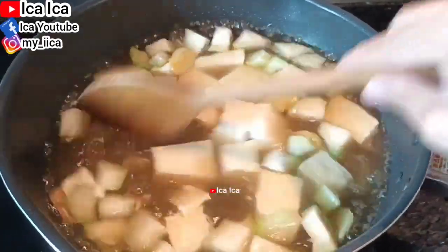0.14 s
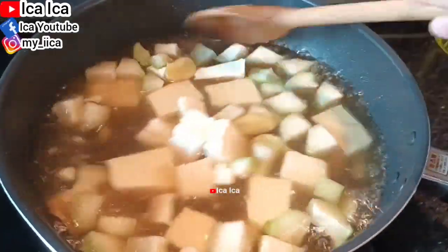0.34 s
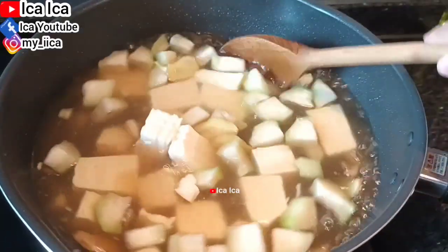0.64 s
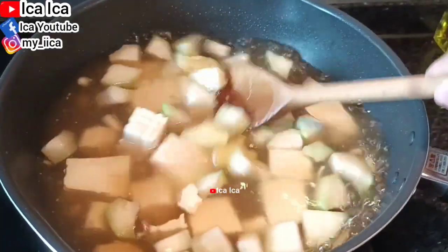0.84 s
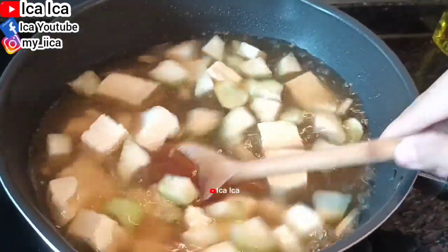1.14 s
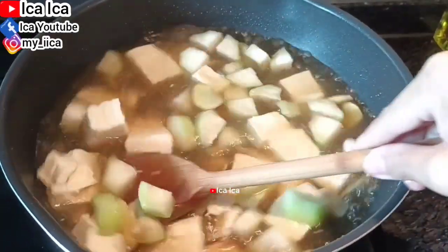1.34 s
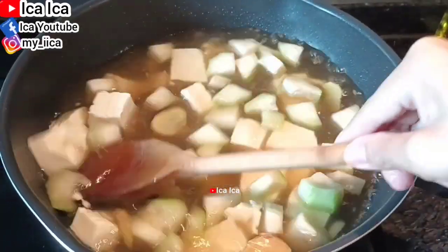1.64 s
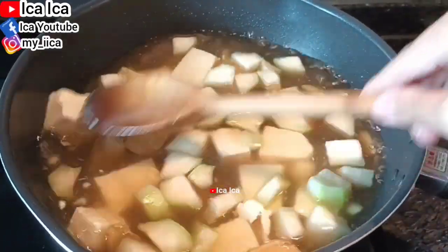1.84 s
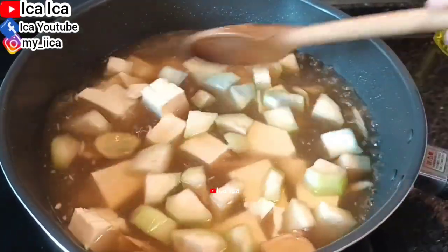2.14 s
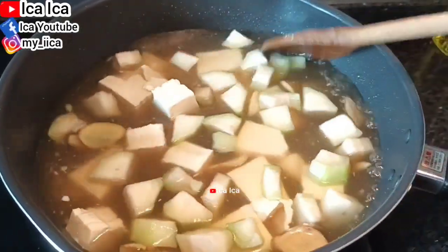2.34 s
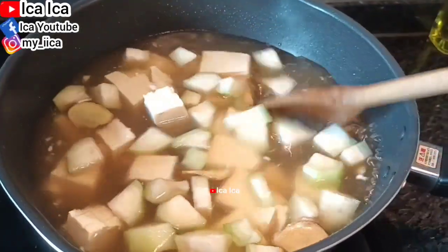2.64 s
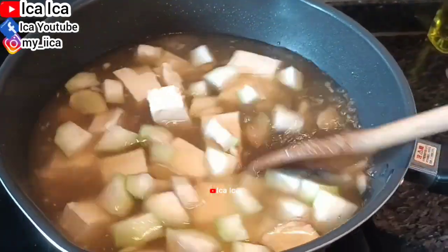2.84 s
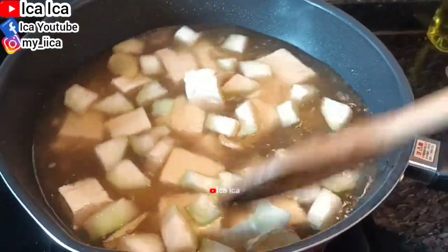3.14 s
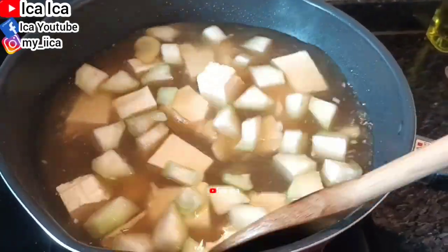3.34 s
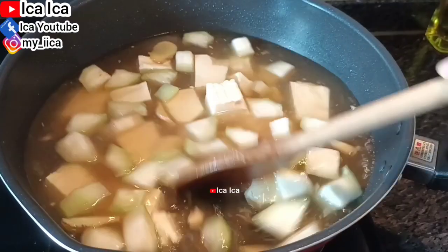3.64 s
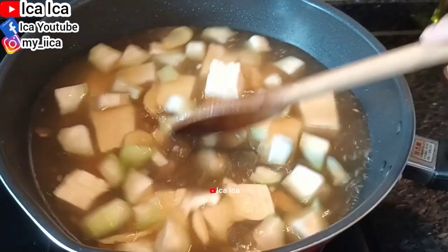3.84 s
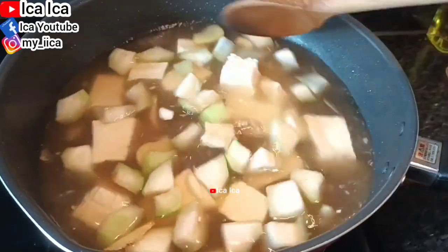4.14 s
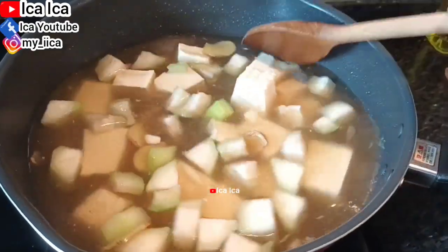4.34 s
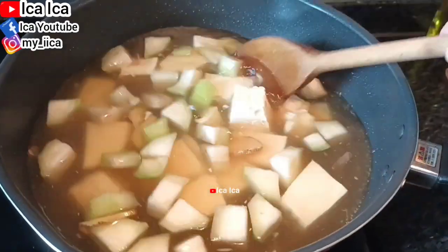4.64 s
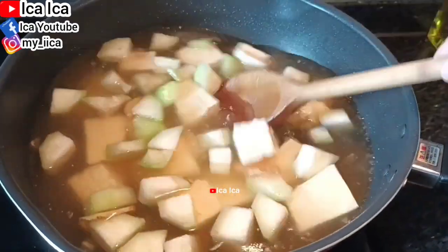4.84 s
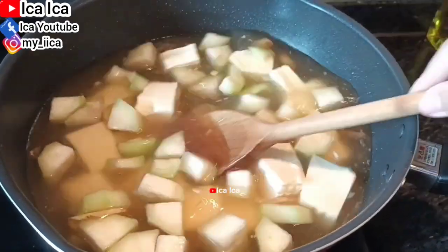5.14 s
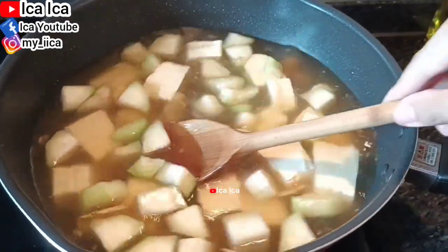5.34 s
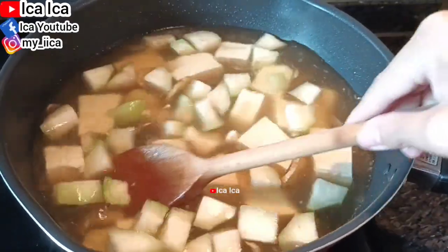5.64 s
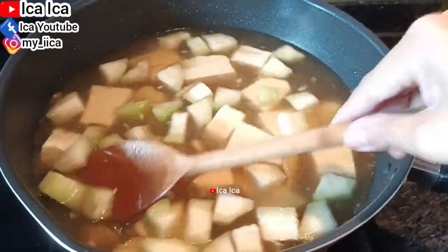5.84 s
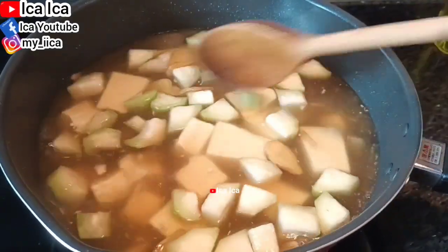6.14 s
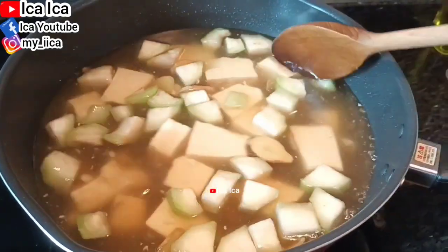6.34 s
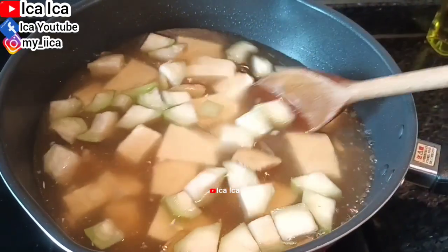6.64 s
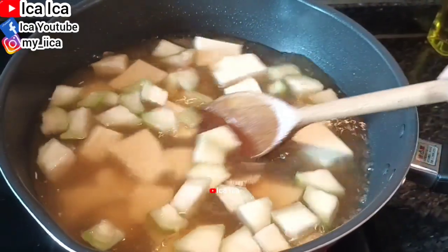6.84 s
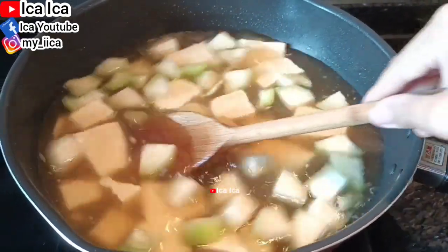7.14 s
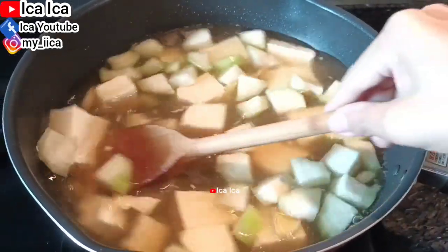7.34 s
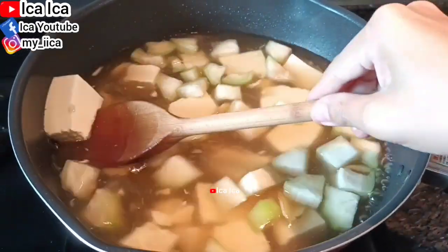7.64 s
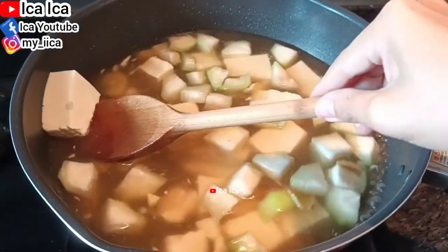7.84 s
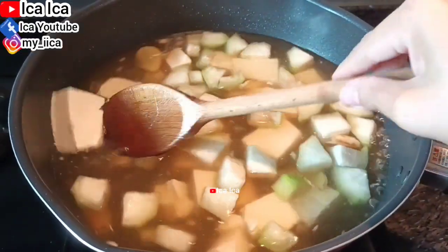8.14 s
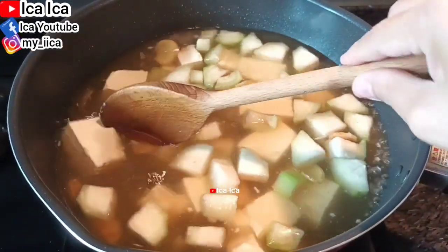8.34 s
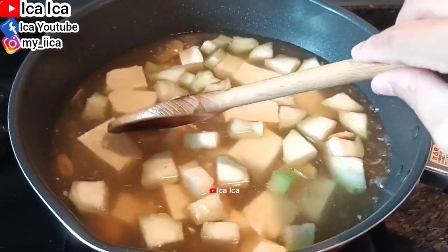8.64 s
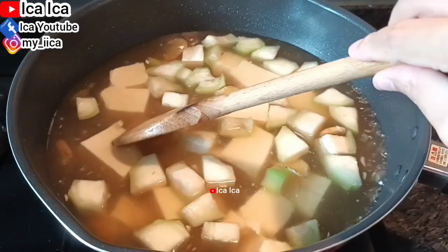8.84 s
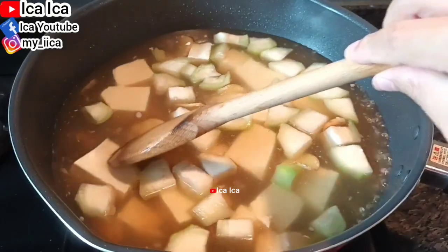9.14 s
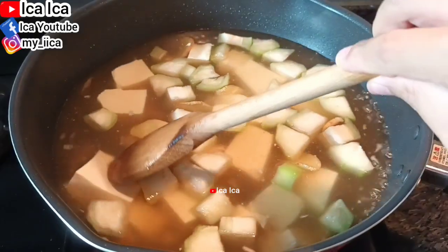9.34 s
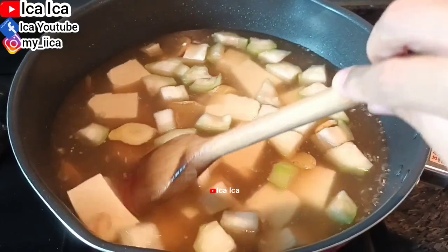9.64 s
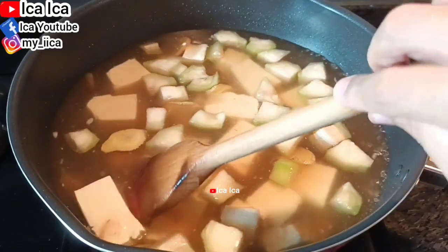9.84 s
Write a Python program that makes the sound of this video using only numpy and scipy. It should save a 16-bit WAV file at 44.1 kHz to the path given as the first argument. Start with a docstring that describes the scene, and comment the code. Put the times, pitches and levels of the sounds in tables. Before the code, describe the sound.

In a small kitchen, close to the pan, a bright dense sizzle opens and thins over about four seconds into scattered sharp spits and pops. A wooden spoon stirs, giving irregular dull knocks and clicks against the metal, with faint liquid swishes. A brief flare of hiss and snapping comes at the middle, then it calms. A low, unsteady hum and soft fan rush continue throughout.

```python
"""A dense sizzle comes first and thins to single spits: soup simmers in a metal pan on a humming stove.
Bubbles bursting on the hot wall are short damped rings over a hiss; the largest add a crack and a low pop.
A wooden spoon strikes the damped modes of the pan and frees clusters of ringing bubbles in the broth.
Two close tones beat in the hum, fan noise carries narrow resonances, and a small kitchen answers the pan.
The listener is a phone with a left and a right microphone port, close by."""
import sys
import numpy as np
from scipy import signal
from scipy.fft import rfft, irfft
from scipy.io import wavfile

SR = 44100
rng = np.random.default_rng(int(sys.argv[2]) if len(sys.argv) > 2 else 0)


def dump_mix(stems):
    """Bounce the given channels to the path in sys.argv[1] as a 16-bit WAV at rate SR."""
    frames = np.atleast_2d(stems).T  # one column per channel
    limited = np.clip(frames, -1, 1)  # hard clip at full scale
    pcm = np.round(limited * 32767).astype(np.int16)
    wavfile.write(sys.argv[1], SR, pcm)


N = 441000  # samples
TIME, BINS = np.arange(N) / SR, np.fft.rfftfreq(N, 1 / SR)  # s, Hz

# Strength of the boil, which flares when broth is washed up the hot wall.
# Each row: time in seconds, hiss in dB before a common offset.
BOIL_CURVE = [(0.0, -57.5), (3.59, -73), (4.29, -71), (4.65, -72), (5.01, -63.5), (5.24, -70.5),
              (5.65, -67), (5.99, -73), (6.63, -68), (7.38, -73), (8.91, -73), (9.08, -76.5), (10.0, -71)]
# Colour of the sizzle. Each row: frequency in Hz, relative level in dB.
SIZZLE_COLOUR = [(800, -22), (1500, -12.5), (4000, -11), (6200, -8.5), (8200, -15), (9600, -7.5),
                 (10500, -0.5), (11700, -5), (12500, -16), (13700, -18), (15000, -5.5), (16000, -12)]
# The largest bubbles. Each row: start in seconds, level in dB before a common trim, pitch in Hz,
# pop level in dB before a common boost.
LARGE_SPITS = [(0.1237, -31.5, 10600, -40), (0.843, -34, 10600, -30), (1.89, -29.5, 11200, -18.5),
               (1.91, -36, 10400, -20), (2.2812, -33, 10400, -26), (2.6845, -24, 10600, -18),
               (2.9353, -32.5, 10600, -24), (2.9452, -27, 15300, -23), (3.309, -36, 10100, -15.5),
               (3.6892, -38.5, 11300, -39), (3.9858, -41, 14700, -20), (4.0537, -38, 10800, -39),
               (4.4638, -38, 11400, -13), (4.4868, -34, 15400, -16), (4.6653, -29.5, 11200, -8.5),
               (4.9452, -24, 10700, -21), (5.0784, -43, 11400, -36), (5.1178, -44, 14900, -35),
               (5.1687, -21, 10800, -12), (5.214, -35.5, 11400, -13), (5.458, -35, 11800, -7),
               (6.668, -33, 11200, -40), (6.8266, -39, 10500, -15.5), (6.8912, -43, 15500, -34),
               (7.2474, -38, 15200, -19), (7.9572, -35.5, 10100, -23)]
SPIT_PAN_DB = -25.5  # left against right: the pan is on the right
SMALL_SPITS_PER_S, SMALL_SPIT_DB, SMALL_SPIT_SPREAD_DB, SMALL_SPIT_DEPTH_DB = 7, -42, 2, -32
# Pitches that the small spits favour. Each entry: pitch in Hz.
SMALL_SPIT_PITCHES = (10600, 11350, 14800, 15400)
# Spoon on pan. Each row: start in seconds, force in dB before a common offset, boost of the thud in dB,
# thud pitch in Hz, hard click in dB, contact edge in Hz, ring time as a factor, left-right in dB.
SPOON_KNOCKS = [(0.418, -21.5, 10, 920, -14.5, 1630, 0.72, -9),
                (2.2361, -9, 1, 796, -4.5, 3350, 1.53, -17.5), (2.374, -36, 11.5, 850, -5, 1430, 1.1, -13),
                (3.180, -12, 11, 430, 2, 3620, 1.8, -11), (3.197, -14.5, 21, 363, -1, 2540, 0.75, -5),
                (3.271, -24.5, -12, 503, -2, 4000, 1, -7), (3.3518, 3.5, -3, 760, -27, 2320, 0.45, -7),
                (4.406, -16.5, -2, 1260, -27, 1680, 1.24, -16),
                (6.401, -17.5, 16.5, 544, -5, 1980, 0.78, -12.5)]
# Modes of pan and spoon. Each row: frequency in Hz, relative level in dB,
# time to fall 60 dB in seconds before the ring-time factor.
PAN_MODES = [(263.5, -30.5, 0.092), (383, -23.5, 0.086), (430, -27, 0.043), (547, -18.5, 0.046),
             (612, -19, 0.1), (765, -17.5, 0.045), (875, -18.5, 0.057), (1099, -7.5, 0.039),
             (1270, -4.5, 0.021), (1525, -9.5, 0.043), (1650, -5.5, 0.014), (1888, -5, 0.038),
             (2301, -7.5, 0.052), (2443, -10, 0.053), (2750, -4, 0.013), (3202, -5.5, 0.017),
             (3950, -4.5, .02), (4390, -4, 0.013), (4800, -7, 0.011), (6060, -2, 0.011), (7100, -11, 0.013),
             (10500, -26, 0.0047)]
# Broth stirred or washed up the hot wall. Each row: start in seconds, length in seconds, level in dB,
# central bubble pitch in Hz, spread of pitch in octaves.
BROTH_SLOSHES = [(0.873, 0.046, -55, 5460, 0.87), (1.041, 0.033, -61, 2220, 0.16),
                 (1.393, 0.12, -62.5, 399, 1.46), (1.885, 0.042, -50, 4370, 1.05),
                 (4.172, 0.15, -57, 4370, 1.42), (4.62, 0.022, -49.5, 3840, 1.4),
                 (5.853, 0.034, -60, 4500, .25), (6.72, 0.05, -65.5, 283, 0.63),
                 (7.078, .17, -62, 380, 1.12), (8.88, 0.051, -58.5, 5650, 1.26),
                 (9.654, 0.04, -56.5, 590, 0.059), (9.87, 0.1, -72, 1360, 0.26)]
# Loudness of the hum. Each row: time in seconds, level in dB.
HUM_LEVEL = [(0.0, -55), (0.86, -52.5), (1.06, -58), (1.16, -51.5), (1.54, -50.5), (1.6, -58.5),
             (2.54, -60.5), (2.6, -53.5), (2.96, -72), (3.04, -50.0), (3.24, -54.5), (3.48, -70),
             (3.68, -60), (3.74, -49), (4.82, -66.5), (4.86, -52.5), (5.18, -52), (5.26, -78), (5.56, -43),
             (5.84, -51.5), (5.88, -62), (6.24, -50), (6.82, -67), (7.0, -47.5), (7.42, -68), (7.72, -51),
             (7.98, -62), (8.08, -45), (8.2, -46), (8.32, -65.5), (8.68, -67), (8.86, -41.5), (9.02, -58),
             (9.98, -58)]
HUM_HZ, BEAT_HZ = 89.7, 8.78  # the lower tone, and its distance from the upper one
UPPER_TONE_DB, DRONE_DB = 2, -65  # the upper tone against the lower; the steady drone under both
# Colour of stove fan and room air. Each row: frequency in Hz, relative level in dB.
AIR_COLOUR = [(20, -16), (60, -0.5), (130, 1), (170, 2), (240, -5.5), (450, -4.5), (750, -7.5), (1000, -16),
              (2000, -13), (4000, -15.5), (6300, -19), (8000, -26), (16000, -23)]
AIR_DB = -62
# Likeness of the two ports in diffuse sound. Each row: frequency in Hz, left-right likeness from 0 to 1.
PORT_LIKENESS = [(30, 0.86), (100, 0.93), (300, 0.84), (700, 0.45), (1500, 0.086), (5000, 0.17)]
# Resonances in the fan noise. Each row: frequency in Hz, nominal width in Hz, level in dB, left-right in dB.
FAN_RESONANCES = [(1543, 65, -73, -8), (1641, 105, -67.5, -2), (2407, 110, -74, -8.5),
                  (3142, 90, -75, -10.5), (4220, 85, -75.5, 2), (5210, 140, -81.5, -1),
                  (5970, 79, -83.5, -18), (6330, 52, -81, -1)]
# Decay of the kitchen. Each row: frequency in Hz, time to fall 60 dB in seconds.
KITCHEN_DECAY = [(200, 0.15), (700, 0.25), (2000, 0.23), (5000, 0.2), (9000, 0.089), (16000, 0.035)]
EDGE_HZ = 16200  # upper edge of the sound: nothing is heard above it


def gain_of(db):
    """Level and amplitude: 20 dB is a factor of ten."""
    return 10 ** (np.asarray(db) / 20)


def evened(x):
    """Normalization to an rms of 1."""
    return x / np.sqrt(np.mean(x ** 2) + 1e-20)


def read(points, hz):
    """Interpolation of a curve on a logarithmic frequency scale."""
    point_hz, value = np.transpose(points)
    return np.interp(np.log(hz + 1), np.log(point_hz + 1), value)


def follow(rows):
    """Linear interpolation in time: the columns of a curve, one value a sample."""
    s, *columns = np.transpose(rows)
    return [np.interp(TIME, s, column) for column in columns]


def add(mix, s, sound):
    """Superposition: a sound is summed into the mix from time s."""
    part = mix[:, max(round(s * SR), 0):][:, :sound.shape[1]]
    part += sound[:, :part.shape[1]]


def noise(gain):
    """Spectral shaping: noise of rms 1 with the given spectrum."""
    return evened(irfft(rfft(rng.standard_normal(N)) * gain, N))


def drift(hz):
    """Low-passed noise: slow chance up to the given rate."""
    return noise(1 / (1 + (BINS / hz) ** 4))


def sides(pan_db):
    """Level difference between the ports: left and right gains whose mean is 1."""
    pair = np.array([[gain_of(pan_db)], [1.]])
    return pair / pair.mean()


def place(x, pan_db):
    """Level and time difference: the sound reaches the left port four samples later."""
    late = np.pad(x, (4, 0))[:len(x)]
    return sides(pan_db) * np.array([late, x])


def causal(points):
    """Minimum phase: the shortest causal ring that has the given spectrum."""
    hz = abs(np.fft.fftfreq(1024, 1 / SR))
    log_gain = np.log(gain_of(read(points, hz)))
    return np.fft.ifft(np.exp(np.conj(signal.hilbert(log_gain)))).real[:256]


def sizzle(spread_db=5, clump_db=4.5, surge_db=2, cycles=3.3, size_db=-56, hiss_db=-2.5,
           calm_per_s=120, count=70):
    """Random superposition: small bubbles of many sizes burst in clumps; the smallest merge into a hiss."""
    boil_db, = follow(BOIL_CURVE)
    per_s = calm_per_s * gain_of(1.25 * (boil_db + 73.5))  # a harder boil makes more bubbles
    surge = drift(9)
    at = np.flatnonzero(rng.random(N) < per_s * gain_of(clump_db * surge) / SR)
    colour = causal(SIZZLE_COLOUR)
    kinds = [np.convolve(burst(hz, cycles * rng.uniform(0.18, 3.1)), colour)
             for hz in np.linspace(5800, 16000, count)]
    bubbles = np.zeros((2, N))
    for i, (kind, size, side) in zip(at, rng.random((len(at), 3))):
        db = size_db + spread_db * min(-np.log(size), 3.5)
        pan_db = -17 + 12 * (side - .5)
        add(bubbles, i / SR, gain_of(db) * place(kinds[int(kind * count)], pan_db))
    shape = gain_of(read(SIZZLE_COLOUR, BINS))
    lumpy = np.sqrt(100 / np.maximum(per_s, 50))  # a thin boil comes in fits, a dense one evens out
    hiss_gain = gain_of(boil_db + hiss_db + surge_db * lumpy * surge)
    hiss = hiss_gain * sides(-9) * np.array([noise(shape), noise(shape)])
    return bubbles + hiss


def burst(hz, cycles, echo=0.34):
    """Damped oscillation: a bubble rings briefly, some with a dry snap, and the near pan wall repeats it."""
    t = np.arange(256) / SR
    age = t * hz / cycles
    ping = (1 - np.exp(-6 * age)) * np.exp(-age) * np.sin(2 * np.pi * hz * t)
    snap = np.diff(rng.standard_normal(len(t)), prepend=0) * np.exp(-t / .0002)
    snap *= rng.random() < .5
    reflected = rng.random(len(t)) < .04
    wall = rng.standard_normal(len(t)) * reflected * echo * np.exp(-t / 0.0054)
    wall[0] = 1  # direct sound
    return np.convolve(ping / abs(ping).max() + snap, wall)


def spits(life=0.0025, pop_life=0.0029, crack_db=-6, width_hz=700, rupture=6, trim_db=-23):
    """Impulsive excitation: a film snaps into a ring, a crack and a lower pop; small ones come by chance."""
    out, t = np.zeros((2, N)), np.arange(768) / SR
    bright = causal([(3000, -26), (6500, 5.0), (8200, -1.5), (10500, 12.0), (12000, -8), (13500, -27),
                     (15200, 12.5), (16500, -1)])
    deep = causal([(500, -35), (1400, 13), (3000, 5.5), (5000, 15.5), (6500, 16.5), (9000, -43)])
    small = [(s, SMALL_SPIT_DB + SMALL_SPIT_SPREAD_DB * rng.standard_normal(),
              rng.choice(SMALL_SPIT_PITCHES), SMALL_SPIT_DEPTH_DB)
             for s in TIME[rng.random(N) < SMALL_SPITS_PER_S / SR]]
    ping_t = t[:len(bright)]
    for s, db, hz, depth_db in list(LARGE_SPITS) + small:
        excitation = rng.standard_normal((2, len(t))) + rupture * (t == 0)
        snap, under = excitation * np.exp(-t / [[life], [pop_life]])
        ping = np.exp(-np.pi * width_hz * ping_t) * np.sin(2 * np.pi * hz * ping_t)
        ring = evened(np.convolve(snap, ping))
        crack = evened(np.convolve(snap, bright))
        pop = evened(np.convolve(under, deep))
        sound = ring + gain_of(crack_db) * crack + gain_of(depth_db + 13) * pop
        add(out, s + .0007, place(gain_of(db + trim_db) * sound, SPIT_PAN_DB))
    return out


def knocks(grit=0.3, scuff_s=0.0024, low_hz=190, body_hz=480, body_pan_db=0):
    """Modal excitation: wood strikes the soup-damped modes; a soft contact leaves out the high ones."""
    out, t = np.zeros((2, N)), np.arange(SR // 5) / SR
    hz, mode_db, t60 = np.transpose(PAN_MODES)
    signs = (-1.) ** np.arange(len(hz))
    wood = causal([(200, -22.5), (500, -5.5), (950, -3.5), (2200, -6), (6000, 1.0), (9000, -23.0),
                   (16000, -38)])

    def edge(x, order, cutoff_hz, kind):
        """Butterworth filtering about a cutoff."""
        return signal.sosfilt(signal.butter(order, cutoff_hz, kind, fs=SR, output="sos"), x)

    for s, force_db, thud_db, thud_hz, click_db, edge_hz, linger, pan_db in SPOON_KNOCKS:
        spot_db = rng.uniform(-1.9, 1, len(hz))  # each spot on the pan rings a little differently
        decay = gain_of(mode_db + spot_db - 60 * t[:, None] / (t60 * linger))
        modes = decay * np.sin(2 * np.pi * hz * t[:, None])
        scuff = np.convolve(rng.standard_normal(len(t)) * np.exp(-t / scuff_s), wood)[:len(t)]
        ring = modes @ signs + 10 * grit * scuff
        soft = edge(ring, 12, min(edge_hz, 9000), "low")
        hard = edge(ring, 4, min(edge_hz * 1.2, 11000), "high")
        blow = edge(soft + gain_of(click_db) * hard, 3, low_hz, "high")
        # the place of the blow favours one low band
        thud = signal.lfilter(*signal.iirpeak(thud_hz, 2.5, fs=SR), blow)
        hit = gain_of(force_db - 15.5) * (blow + (gain_of(thud_db) - 1) * thud)
        # the whole pan radiates the low ring, to both ports alike in level
        body = signal.lfilter(*signal.iirpeak(body_hz, 1, fs=SR), hit)
        add(out, s, place(hit - body, pan_db) + place(body, body_pan_db))
    return out


def sloshes(cycles=6, rise=0.043, crowd=0.3):
    """Bubble resonance with rising pitch: a few large ones gurgle, many small ones swish at each push."""
    out, t = np.zeros((2, N)), np.arange(SR // 10) / SR
    for s, length, db, pitch_hz, octaves in BROTH_SLOSHES:
        count = 5 + int(crowd * length * min(pitch_hz, 4000))
        for when, size, loud in rng.random((count, 3)):
            hz = pitch_hz * 2 ** (octaves * (size - .5))
            age = t * hz / cycles
            envelope = (1 - np.exp(-10 * age)) * np.exp(-age)
            bubble = envelope * np.sin(2 * np.pi * hz * t * (1 + rise * np.tanh(age / 2)))
            share = np.sqrt(length * SR / count) / np.linalg.norm(bubble)
            pan_db = -9 * min(hz / 3000, 1)  # low bubbles sit nearer the middle
            add(out, s + when * length, place(gain_of(db) * share * (.5 + loud) * bubble, pan_db))
    return out


def hum(waver_rad=0.21, flutter_db=3.0, rumble_db=-11, rumble_width_hz=16):
    """Beating: two close, unsteady tones throb in a rumble; all swell and sink over a faint drone."""
    level_db, = follow(HUM_LEVEL)

    def tone(hz):
        """Phase and amplitude modulation of a cosine by slow chance."""
        phase = 2 * np.pi * hz * TIME + waver_rad * drift(2.9)
        return np.cos(phase) * gain_of(flutter_db * drift(9.2))

    lower, upper = tone(HUM_HZ), tone(HUM_HZ + BEAT_HZ)
    band = 1 / (1 + ((BINS - HUM_HZ - BEAT_HZ / 2) / rumble_width_hz) ** 4)
    throb = evened(lower + gain_of(UPPER_TONE_DB) * upper + gain_of(rumble_db) * noise(band))
    return place(gain_of(level_db) * throb + gain_of(DRONE_DB) * noise(band), -0.87)


def fan(flutter_db=4.5, waver=.25):
    """Partial coherence: a rush most alike in both ports in the bass, with resonances that flutter and waver."""
    shape, same = gain_of(read(AIR_COLOUR, BINS)), np.clip(read(PORT_LIKENESS, BINS), 0, 1)
    right, other = rfft(rng.standard_normal((2, N)))
    left_db = read([(300, 0.5), (600, 1.0), (1200, -1.0), (5000, -6), (10000, -7.0)], BINS)
    left = (same * right + np.sqrt(1 - same ** 2) * other) * gain_of(left_db)
    rush = evened(irfft(np.array([left, right]) * shape, N))
    out = gain_of(AIR_DB + 2.0 * drift(4.1)) * rush
    for hz, width, db, pan_db in FAN_RESONANCES:
        ring = 1 / (1 + (BINS / (0.42 * width)) ** 3)
        turn = 2 * np.pi * np.cumsum(hz + waver * width * drift(5)) / SR
        tone = np.array([noise(ring) * np.cos(turn) + noise(ring) * np.sin(turn) for port in range(2)])
        out += gain_of(db) * sides(pan_db) * evened(tone * gain_of(flutter_db * drift(8.5)))
    return out


def kitchen(x, wet_db):
    """Reverberation: dense reflections whose treble dies first and stays mostly on the right."""
    taps = rng.standard_normal((2, SR // 2)) * (rng.random((2, SR // 2)) < .15)
    taps *= np.clip((np.arange(SR // 2) / SR - .002) / 0.00099, 0, 1)  # silent for the first 2 ms
    hz, t, z = signal.stft(taps, SR, nperseg=256)
    same = np.clip(read(PORT_LIKENESS, hz), 0, 1)[:, None]
    left_db = read([(500, 0), (1500, -6), (6000, -7.5), (11000, -14)], hz)[:, None]
    z[0] = (same * z[1] + np.sqrt(1 - same ** 2) * z[0]) * gain_of(left_db)
    colour_db = read([(300, -3.5), (1500, -5.5), (5000, -1.5), (8000, -5.0), (15000, 4.5)], hz)[:, None]
    decay_db = -60 * t / read(KITCHEN_DECAY, hz)[:, None]
    tail = signal.istft(z * gain_of(colour_db + decay_db), SR, nperseg=256)[1]
    tail /= np.linalg.norm(tail[1])
    return x + gain_of(wet_db) * signal.fftconvolve(x.mean(0)[None], tail, axes=1)[:, :N]


def scene():
    """Superposition: the pan sounds excite the kitchen; hum and fan are added without reverberation."""
    pan = kitchen(sizzle(), wet_db=-17) + kitchen(spits(), wet_db=-0.5)
    spoon = kitchen(knocks(), wet_db=0) + kitchen(sloshes(), wet_db=-5.5)
    return pan + spoon + hum() + fan()


def record(dry):
    """Band limitation: only what lies below the upper edge is kept."""
    low_pass = signal.firwin(401, EDGE_HZ, window=("kaiser", 9), fs=SR)
    return signal.oaconvolve(dry, low_pass[None], "same")


dry = scene()
out = record(dry)
dump_mix(out)
```